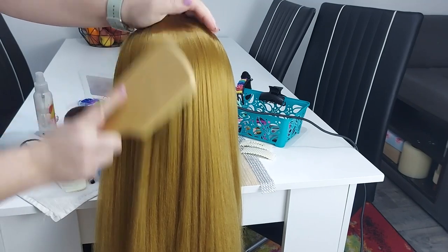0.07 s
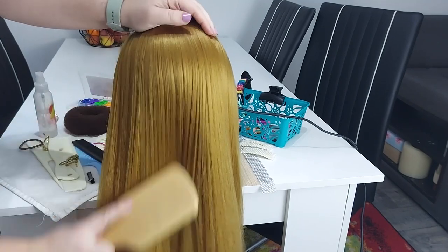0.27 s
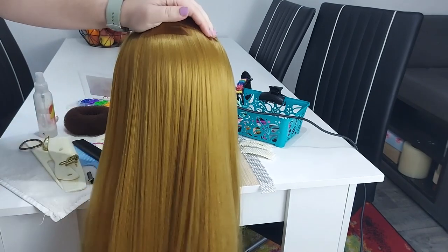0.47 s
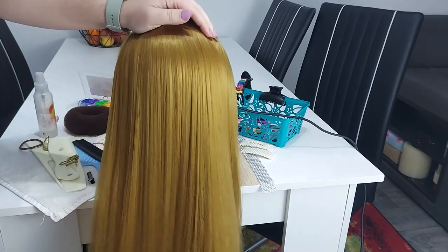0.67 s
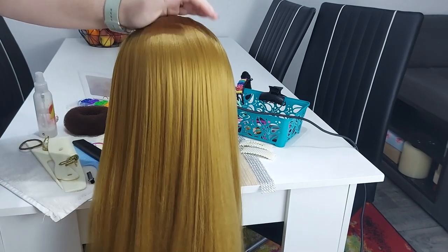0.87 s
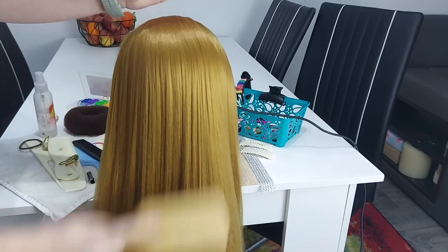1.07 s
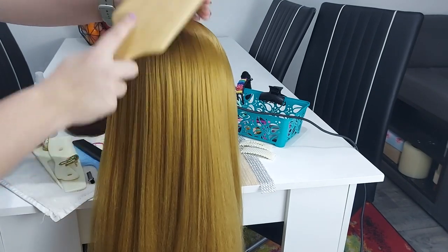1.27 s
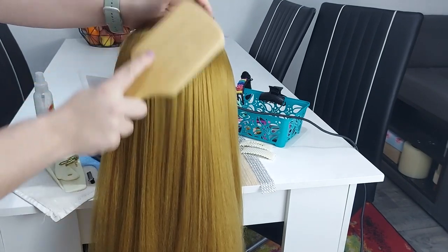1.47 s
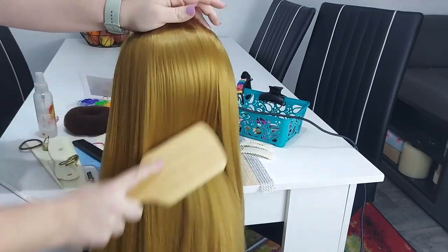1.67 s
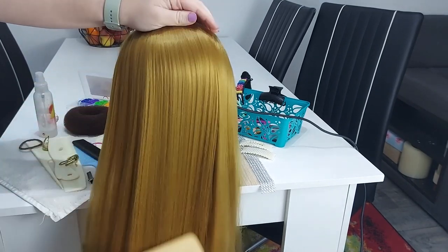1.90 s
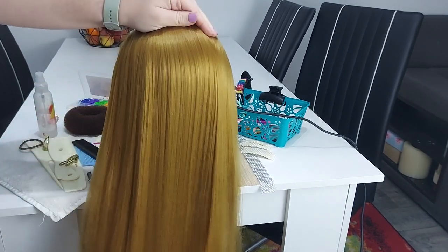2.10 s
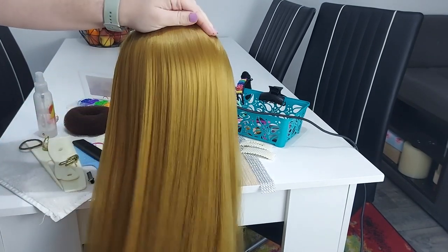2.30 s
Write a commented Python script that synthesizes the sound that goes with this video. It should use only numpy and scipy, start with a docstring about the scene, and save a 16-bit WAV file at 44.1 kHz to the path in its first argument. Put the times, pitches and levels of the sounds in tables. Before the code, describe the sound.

A paddle brush is drawn twice through long hair: soft landing bump, scratchy rasp, fine hiss down the lengths, then bristles catching and flicking with hollow ticks. Small quiet room, close microphone, very faint air noise.

```python
"""In a small quiet room, a wooden paddle brush is drawn twice through long hair.
The bristles land with soft bumps, rasp over the crown, hiss down the lengths, then catch and flick free.
Rasp, plucks and hiss are filtered noise and tiny random slips, swelling with the pressure of the brush.
Each flick is a click plus the ringing modes of the hollow pad; each tug sets off a low wavering thrum.
Quiet filtered noise is the still air, and a short noise tail is the room."""
import sys
import numpy as np
from scipy import signal
from scipy.fft import rfft, irfft
from scipy.io import wavfile

SR = 44100
rng = np.random.default_rng(int(sys.argv[2]) if len(sys.argv) > 2 else 0)


def unload_wav(signal):
    """Save mono or channel-first audio to the path in sys.argv[1] as 16-bit WAV at rate SR, clipped to [-1, 1]."""
    wavfile.write(
        sys.argv[1],
        SR,
        np.round(np.clip(np.atleast_2d(signal).T, -1, 1) * 32767).astype(np.int16),
    )


N = 103414  # length in samples, about 2.3 s


def amp(db):
    """Turns decibels into a gain."""
    return 10 ** (np.asarray(db) / 20)


def unit(x):
    """Scales a sound to an average (rms) strength of 1."""
    return x / np.sqrt(np.mean(x ** 2) + 1e-20)


def add(mix, start_s, sound):
    """Mixes a sound in at a given time, cutting off what runs past the end."""
    start = max(round(start_s * SR), 0)
    part = mix[start:][:len(sound)]
    part += sound[:len(part)]  # a view, so this changes the mix itself


def response(points, size=2048):
    """Turns a tone colour into a filter that only rings after its input, with energy 1."""
    hz, db = np.transpose(points)
    grid_hz = abs(np.fft.fftfreq(size, 1 / SR))
    log_gain = np.log(amp(np.interp(np.log(grid_hz + 1), np.log(hz), db)))
    # the Hilbert transform gives the phase that puts the energy as early as possible
    spectrum = np.exp(signal.hilbert(log_gain).conj())
    h = np.fft.ifft(spectrum).real[:size // 2]
    return h / np.linalg.norm(h)


def colour(x, points, size=2048):
    """Filters a sound by a tone colour and scales it to rms 1."""
    filtered = signal.fftconvolve(x, response(points, size=size))[:N]
    return unit(filtered)


def wander(rate_hz):
    """Smooth random motion with rms 1: noise that fades out around and above the given rate."""
    spectrum = rfft(rng.standard_normal(N))
    fade = np.exp(-(np.fft.rfftfreq(N, 1 / SR) / rate_hz) ** 2)
    return unit(irfft(spectrum * fade, N))


def slips(per_s, spread_db, smooth):
    """Stick-slip friction: tiny random impulses of uneven size, plus an amount of smooth noise."""
    size = amp(spread_db * np.minimum(rng.exponential(1, N), 3))
    direction = rng.choice([-1, 1], N)
    happens = rng.random(N) < per_s / SR
    return unit(size * direction * happens) + smooth * rng.standard_normal(N)


def swell(peak_s, level_db, rise_s, fall_s):
    """Gain over time of one contact: pressure builds to a peak and lets go."""
    t = np.arange(N) / SR - peak_s
    width_s = np.where(t < 0, rise_s, fall_s)
    return amp(level_db) * np.exp(-abs(t / width_s) ** 1.4 / 2)


def pressure(contacts):
    """Gain over time of overlapping contacts, whose powers add up."""
    power = sum(swell(*contact) ** 2 for contact in contacts)
    return np.sqrt(power)


# colour of the still air: pitch_hz [Hz], level_db [dB, relative]
AIR_COLOUR = [(35, -7.5), (65, -24.5), (170, -32), (350, -37.5), (560, -26), (880, -25.5), (1100, -28),
              (4500, -36), (15500, -42)]


def still_air(level_db=-66.5):
    """The quiet background of the room: steady noise, strongest in the deep bass."""
    return amp(level_db) * colour(rng.standard_normal(N), AIR_COLOUR, size=8192)


# soft bumps as the brush lands on the head: start_s [s], level_db [dB]
BUMPS = [(0.001, -41), (1.444, -36.5), (1.478, -38)]


def bumps(pitch_hz=31, decay_s=0.024):
    """A heavily damped low push as the brush meets the head."""
    out = np.zeros(N)
    t = np.arange(SR // 5) / SR
    push = np.sin(2 * np.pi * pitch_hz * t) * np.exp(-(t / decay_s) ** 2 / 2)
    for start_s, level_db in BUMPS:
        add(out, start_s, amp(level_db) * push)
    return out


def snap(points, decay_s, splinters=0.43):
    """A short crack, peak 1: one sharp impulse with a splintery noise tail, then coloured."""
    t = np.arange(SR // 50) / SR
    burst = splinters * rng.standard_normal(len(t)) * np.exp(-t / decay_s)
    burst[0] = 1
    crack = signal.fftconvolve(burst, response(points))
    return crack / abs(crack).max()


# ringing modes of the hollow pad: pitch_hz [Hz], level_db [dB, relative], time to fall 60 dB t60_s [s]
PAD_MODES = [(595, -4, 0.086), (680, -4, 0.094), (785, -9.5, 0.039), (907, -7, 0.046), (993, -11, 0.034),
             (1285, 4, 0.0067), (1623, 3, 0.029)]


def pad_ring(middle_hz, strike_octaves=0.35, low_cut_hz=523):
    """The hollow pad's answer to one flick, peak 1: the place of the bristle picks the modes."""
    t = np.arange(SR // 10) / SR
    ring = np.zeros(len(t))
    for pitch_hz, level_db, t60_s in PAD_MODES:
        # modes far from the middle pitch are struck less
        strike = np.exp(-(np.log2(pitch_hz / middle_hz) / strike_octaves) ** 2)
        decay = np.exp(-np.log(1000) * t / t60_s)
        ring += strike * amp(level_db) * decay * np.sin(2 * np.pi * pitch_hz * t)
    low_cut = signal.butter(2, low_cut_hz, "high", fs=SR, output="sos")
    ring = signal.sosfilt(low_cut, ring)
    return ring / abs(ring).max()


# single bristles flicking free or landing:
# start_s [s], click_db [dB], ring_db [dB], middle_hz of the pad modes struck [Hz]
FLICKS = [(0.033, -50, -39, 1350), (0.046, -68, -36.5, 790), (.074, -48, -37, 710), (0.1119, -50, -34, 845),
          (0.409, -50, -37.5, 860), (0.421, -44, -36, 830), (.481, -51, -37, 800), (.513, -61, -40, 860),
          (.632, -60, -42.5, 880), (0.727, -50, -38.5, 940), (.764, -40, -43.5, 585),
          (1.356, -95, -51.5, 630), (1.4214, -66, -38.5, 790), (1.4275, -45, -39.5, 706),
          (1.459, -39, -38.5, 660), (1.533, -52, -40, 610), (1.809, -40.5, -44.5, 800),
          (1.893, -41, -45, 640), (1.982, -39, -38.5, 770), (2.042, -39.5, -34.5, 560),
          (2.151, -54, -48, 1080), (2.202, -52.5, -36, 1080), (2.22, -43.5, -42.5, 750),
          (2.262, -43, -40, 890), (2.326, -54, -36, 780)]
# colour of a bristle click, also used for the ticks of sliding hair: pitch_hz [Hz], level_db [dB, relative]
CLICK_COLOUR = [(200, -7), (1400, 10), (3800, 4.5), (6000, -7), (16000, -32)]


def flicks():
    """A bristle springs free or lands with a click and makes the hollow pad ring."""
    out = np.zeros(N)
    for start_s, click_db, ring_db, middle_hz in FLICKS:
        add(out, start_s, amp(click_db) * snap(CLICK_COLOUR, decay_s=0.0018))
        add(out, start_s, amp(ring_db) * pad_ring(middle_hz))
    return out


# tugs on the hair that set off the low thrum: peak_s [s], level_db of the first throb [dB]
PULLS = [(.06, -57), (.453, -46), (0.515, -49.5), (0.66, -46), (0.731, -42.5), (.783, -50), (1.456, -42.5),
         (1.85, -54), (1.949, -40.5), (2.051, -40.5), (2.269, -47)]


def wavering_tone(pitch_hz, drift=0.057, overtone_db=-21):
    """A low tone of rms 1 with a weak octave overtone and a randomly drifting pitch."""
    drifting_hz = pitch_hz * (1 + drift * wander(rate_hz=23))
    phase = 2 * np.pi * np.cumsum(drifting_hz) / SR
    return unit(np.sin(phase) + amp(overtone_db) * np.sin(2 * phase))


def thrum(rise_s=0.016, throb_fall_s=0.018, sway_fall_s=0.071, sway_db=-6):
    """Each tug makes the hair and its support throb, then sway on a little lower."""
    throbs = [(peak_s, level_db, rise_s, throb_fall_s) for peak_s, level_db in PULLS]
    sways = [(peak_s, level_db + sway_db, rise_s, sway_fall_s) for peak_s, level_db in PULLS]
    throb = pressure(throbs) * wavering_tone(pitch_hz=85)
    sway = pressure(sways) * wavering_tone(pitch_hz=73.5)
    return throb + sway


# bristles plucking through the strands:
# peak_s [s], level_db [dB], rise_s [s], fall_s [s], ring_hz where the pad rings most [Hz]
PLUCKING = [(.085, -50.5, 0.026, 0.038, 786), (.195, -52, 0.065, 0.061, 680), (.45, -50, 0.072, 0.043, 900),
            (0.682, -47, 0.029, 0.034, 870), (.742, -49, 0.02, 0.027, 490),
            (1.442, -46, 0.0081, 0.018, 653), (1.654, -43, 0.064, 0.036, 650),
            (2.006, -48, 0.13, 0.06, 667), (2.299, -47.5, 0.042, 0.044, 750)]
# colour of the plucks before the pad's focus is added: pitch_hz [Hz], level_db [dB, relative]
PLUCK_COLOUR = [(140, -10.5), (270, -15), (450, -9), (550, 5), (1050, -8.5), (1200, -8.5), (1900, -12),
                (2400, -21.5), (3500, -21.5), (15000, -52)]


def plucking(focus_db=4.0, focus_octaves=0.29):
    """Strands pluck the bristles; the pad rings higher or lower with the place of contact."""
    hz = np.geomspace(100, 16000, 200)
    colour_hz, colour_db = np.transpose(PLUCK_COLOUR)
    body_db = np.interp(np.log(hz), np.log(colour_hz), colour_db)
    flicker = amp(2 * wander(rate_hz=85))
    plucks = slips(per_s=1000, spread_db=3.0, smooth=0.5) * flicker
    out = np.zeros(N)
    for *contact, ring_hz in PLUCKING:
        focus = focus_db * np.exp(-(np.log2(hz / ring_hz) / focus_octaves) ** 2)
        points = np.transpose([hz, body_db + focus])
        shuffled = rng.permutation(plucks)  # each contact gets its own order of samples
        out += swell(*contact) * colour(shuffled, points)
    return out


# bristles scraping over the crown: peak_s [s], level_db [dB], rise_s [s], fall_s [s]
CROWN = [(.18, -45, 0.056, 0.021), (1.658, -46, 0.061, 0.032)]
# colour of the scrape: pitch_hz [Hz], level_db [dB, relative]
RASP_COLOUR = [(170, -23), (400, -4.5), (700, -4.5), (1100, -6.5), (1600, 1), (2900, -7), (3300, -13),
               (6000, -21), (15000, -40)]


def crown():
    """Rows of bristles scrape over the head in quick clumps."""
    flicker = amp(1.3 * wander(rate_hz=230))
    scrape = slips(per_s=2400, spread_db=4.5, smooth=0.52) * flicker
    return pressure(CROWN) * colour(scrape, RASP_COLOUR)


# the pad judders as it leaves the crown: start_s [s], level_db [dB], pitch_hz [Hz]
JUDDERS = [(.173, -35, 635), (.1815, -33.5, 669), (.19, -37.5, 594), (.196, -48, 680), (.205, -35.5, 602)]


def judders(length_s=0.0115):
    """The pad judders in brief hums that swell up and die away."""
    out = np.zeros(N)
    t = np.arange(0, length_s, 1 / SR)
    arch = np.sin(np.pi * t / length_s)
    for start_s, level_db, pitch_hz in JUDDERS:
        add(out, start_s, amp(level_db) * arch * np.sin(2 * np.pi * pitch_hz * t))
    return out


# hair sliding along the bristles: peak_s [s], level_db of the hiss [dB], rise_s [s], fall_s [s]
SLIDE = [(.18, -63.5, 0.04, 0.24), (.395, -58.5, 0.043, 0.064), (.728, -61, 0.04, 0.062),
         (.98, -74, 0.047, 0.033), (1.67, -63.5, 0.089, 0.034), (1.87, -57.5, 0.14, 0.1),
         (2.31, -62.5, 0.046, .05)]
# colour of the hiss: pitch_hz [Hz], level_db [dB, relative]
HISS_COLOUR = [(300, -5.5), (700, 5.5), (1700, 9), (2700, 2), (4300, 3), (6800, -1), (9000, 2.5),
               (10500, -3), (16000, -4)]


def slide(ticks_db=-9):
    """Fine hiss of hair running between the bristles, with sparse ticks of single strands."""
    flicker = amp(0.93 * wander(rate_hz=120))
    friction = slips(per_s=3000, spread_db=4, smooth=1.6) * flicker
    ticks = slips(per_s=120, spread_db=4.5, smooth=0)
    hiss = colour(friction, HISS_COLOUR)
    return pressure(SLIDE) * (hiss + amp(ticks_db) * colour(ticks, CLICK_COLOUR))


def rumble(above_hiss_db=3.5):
    """The sliding brush adds a soft low rumble that swells along with the hiss."""
    points = [(25, 1), (50, -3.5), (90, 1), (200, -30.5), (500, -53)]  # pitch_hz, level_db
    low_noise = colour(rng.standard_normal(N), points, size=8192)
    return amp(above_hiss_db) * pressure(SLIDE) * low_noise


# tiny static sparks in the ends of the hair: start_s [s], level_db [dB]
SPARKS = [(1.9414, -44), (1.9818, -35), (1.993, -44), (2.0428, -38.5)]
# colour of a spark: pitch_hz [Hz], level_db [dB, relative]
SPARK_COLOUR = [(500, -22), (4000, -4), (10500, -11.5), (13500, -1), (16000, -18)]


def sparks():
    """Static electricity jumps in the ends of the hair as very short cracks."""
    out = np.zeros(N)
    for start_s, level_db in SPARKS:
        add(out, start_s, amp(level_db) * snap(SPARK_COLOUR, decay_s=0.00088))
    return out


def room(x, t60_s=0.22, tail_db=-9):
    """Adds the short tail of a small furnished room: noise that dies away, starting after 4 ms."""
    t = np.arange(SR // 2) / SR
    tail = rng.standard_normal(len(t)) * amp(-60 * t / t60_s) * (t > .004)
    tail /= np.linalg.norm(tail)
    return x + amp(tail_db) * signal.fftconvolve(x, tail)[:N]


def scene():
    """The brush in the room, over still air; the low sounds get no room tail."""
    brush = flicks() + plucking() + crown() + judders() + slide() + sparks()
    low = bumps() + thrum() + rumble()
    return (still_air() + room(brush) + low)[None]


def record(dry):
    """Removes the treble above an upper edge of 15800 Hz."""
    low_pass = signal.firwin(511, 15800, window=("kaiser", 9), fs=SR)
    return signal.oaconvolve(dry, low_pass[None], "same")


dry = scene()
out = record(dry)
unload_wav(out)
```